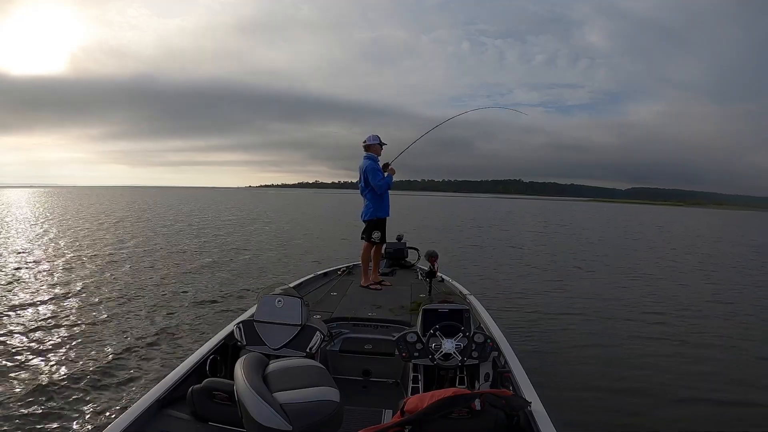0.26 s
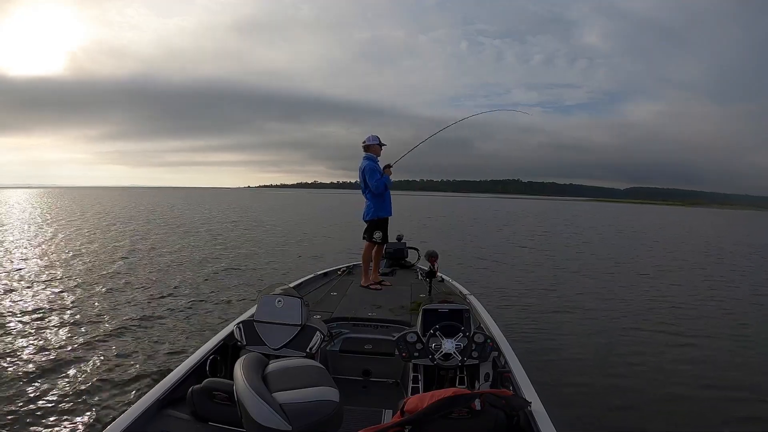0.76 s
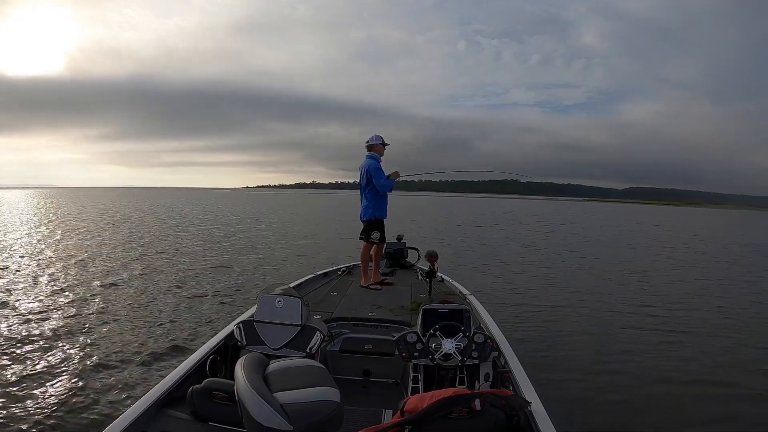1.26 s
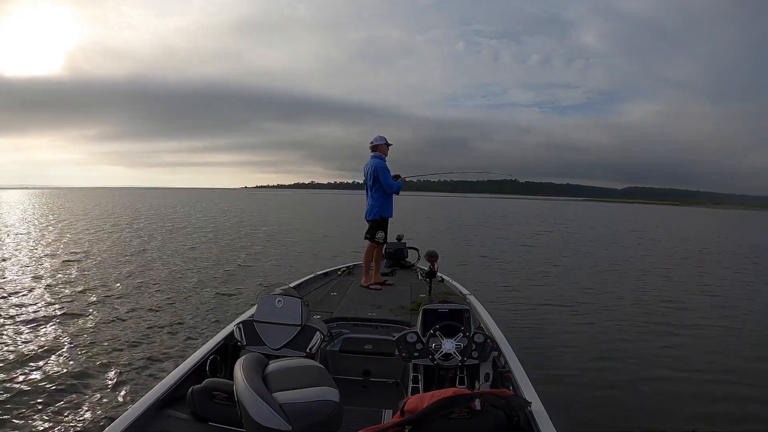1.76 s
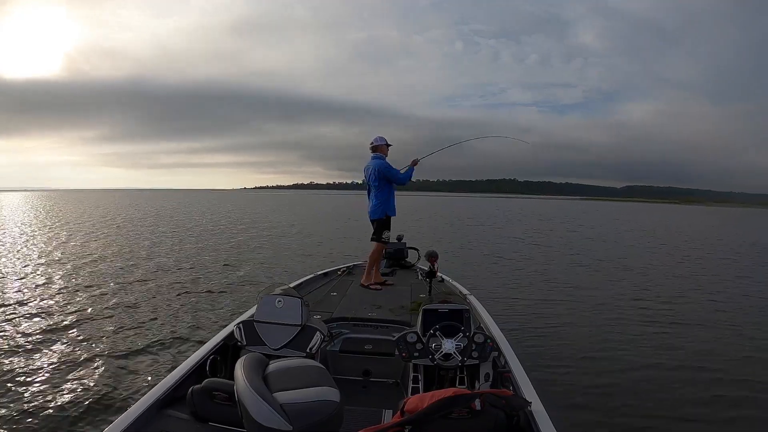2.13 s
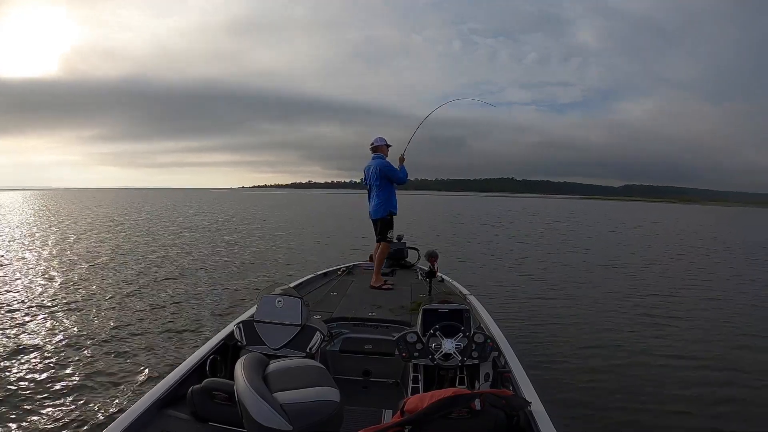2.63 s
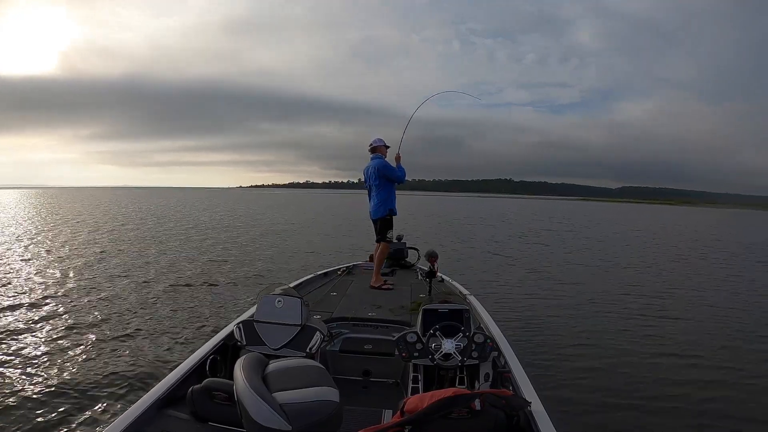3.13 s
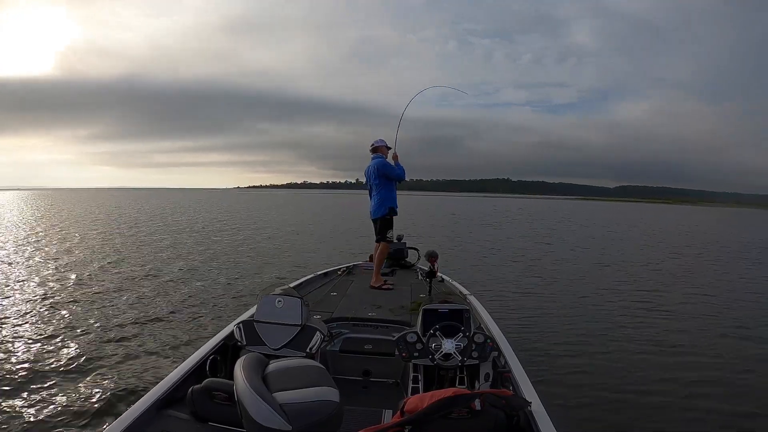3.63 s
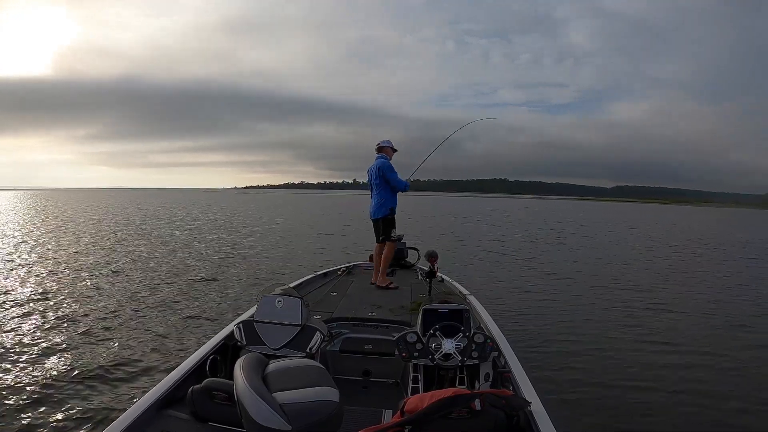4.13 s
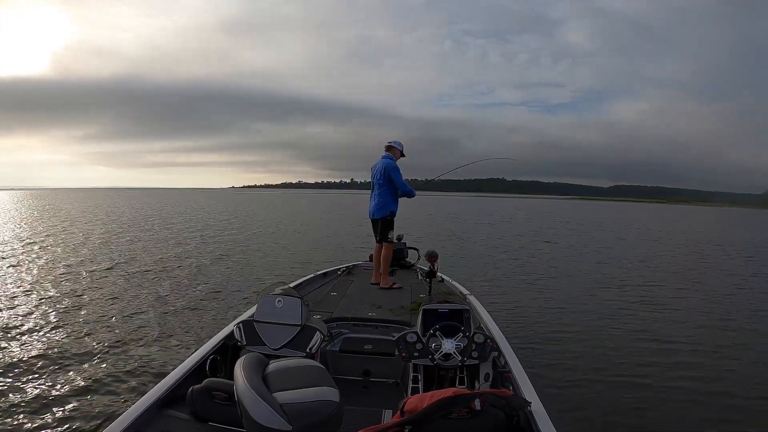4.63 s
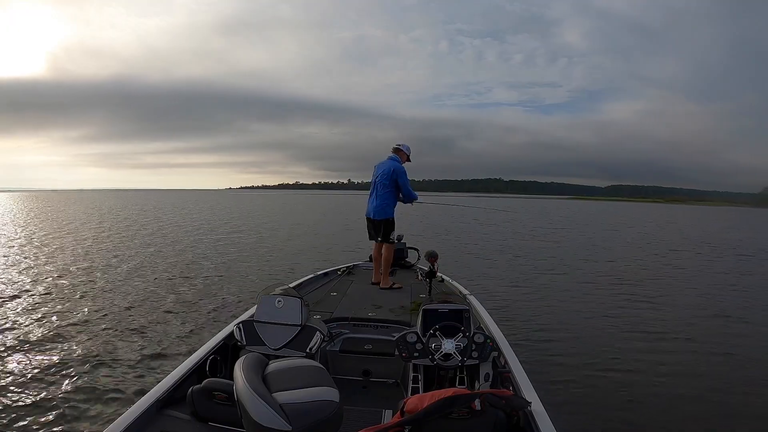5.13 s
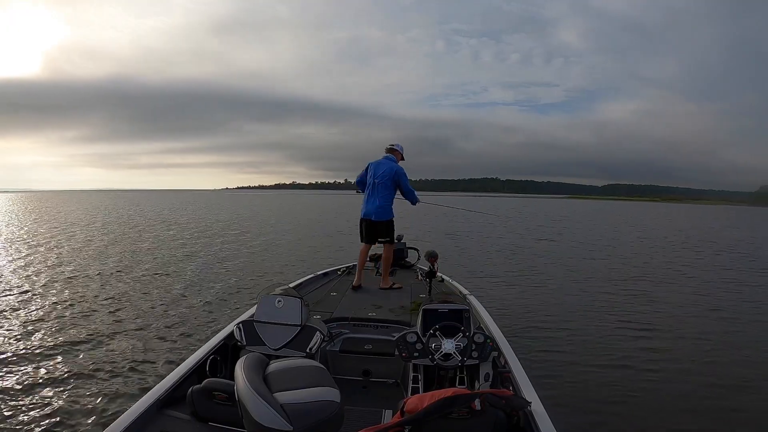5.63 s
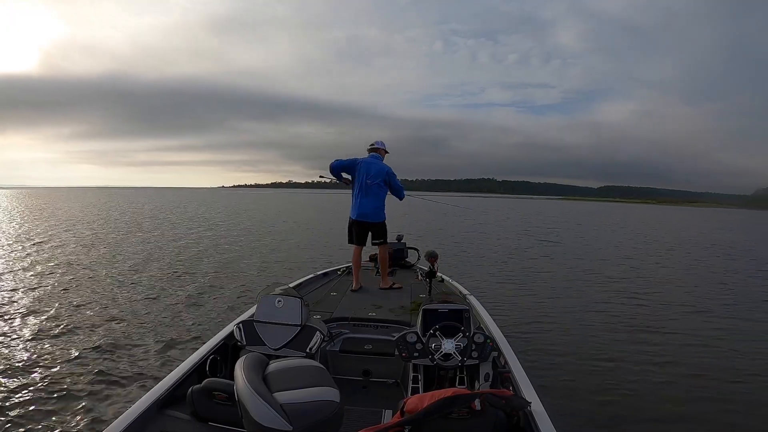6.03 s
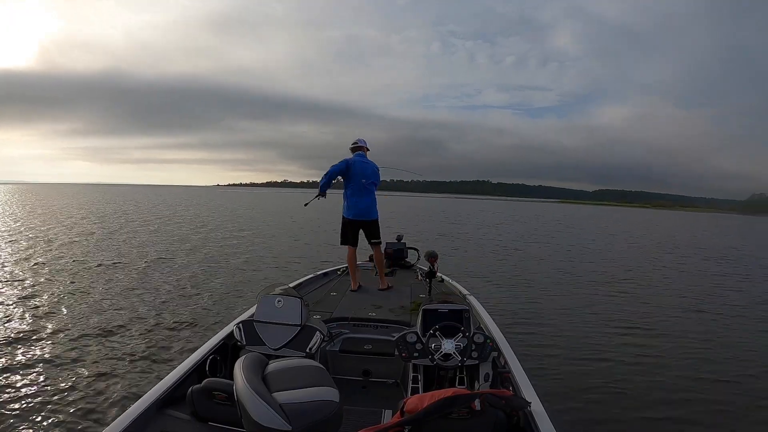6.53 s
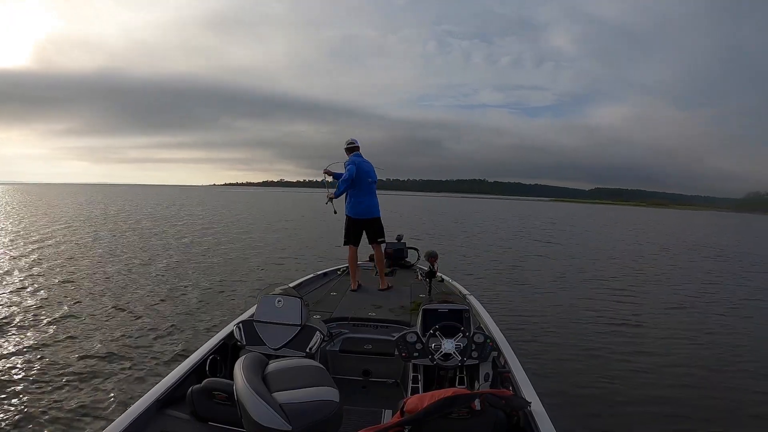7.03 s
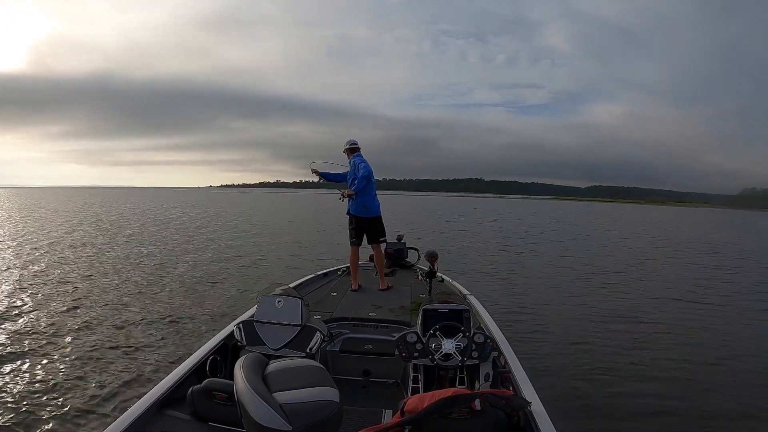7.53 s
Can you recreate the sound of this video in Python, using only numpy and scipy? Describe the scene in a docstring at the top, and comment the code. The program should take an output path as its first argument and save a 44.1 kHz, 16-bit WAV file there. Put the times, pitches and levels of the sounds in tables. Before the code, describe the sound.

Stereo microphone on a boat, dry open air, no echo. Low wind rumble flutters differently on each side. Hollow hull knocks near 400 hertz come irregularly from the left, the strongest around six seconds, with tiny spray clicks and bubble plinks between. An angler's sleeves and line swish briefly, most clearly after six seconds. Distant water hiss stays faint; a few barely audible thin whistles pass.

```python
"""Small boat on open water

Close by, left of the microphone, wavelets knock the hollow hull: gliding air-pocket tones, hull modes and spray noise.
Spray and tackle tick as noise bursts, drops ring as gliding sines, and sleeves and line swish as swelling noise.
Faint near-sine whistles come from afar; low noise is wind on the two microphone ports.
Smooth hiss from the ripples fills the distance."""
import sys
import numpy as np
from scipy import signal
from scipy.fft import rfft, irfft, next_fast_len
from scipy.io import wavfile
from scipy.ndimage import uniform_filter1d

SR = 44100
rng = np.random.default_rng(int(sys.argv[2]) if len(sys.argv) > 2 else 0)


def master(y):
    """Save y as 16-bit WAV."""
    cut = np.clip(np.atleast_2d(y).T, -1, 1)
    pcm = np.round(cut * 32767)  # scale
    wavfile.write(sys.argv[1], SR, pcm.astype(np.int16))


N = 343098
FFT_SIZE = next_fast_len(N)
BIN_HZ = np.maximum(np.fft.rfftfreq(FFT_SIZE, 1 / SR), 1)

# Balances are left minus right. Spectra are relative densities: [f/Hz, level/dB per Hz].
# Wavelets on the hull, before filtering and panning: [t/s, slap level/dB, air pocket f/Hz, its relative rise/(1/s),
# pocket level/dB, pocket life to 1/e /s, upper deep mode level/dB, factor on the life of the deep modes]
HULL_KNOCKS = [(.782, -24, 403, 3.17, -28, .031, -44, .6), (1.311, -24, 425, .5, -49, .02, -59, .6),
               (1.959, -30, 433, .46, -40, .065, -40, .95), (2.916, -29, 487, 1.88, -42, .019, -45, .41),
               (3.51, -28, 429, 1.12, -33, .073, -37, .91), (4.174, -27, 473, 3.99, -40, .031, -37, .61),
               (6.03, -20, 413, -1.16, -29, .015, -28, .56), (6.608, -28, 411, 4.0, -36, .026, -47, 1.04),
               (7.197, -28, 435, -1.53, -41, .031, -47, 1.05)]
# Deep hull modes, lower then upper: [f/Hz, life to 1/e before each knock's factor /s]
DEEP_HULL_MODES = [(350, .05), (468, .07)]
# Dry part of the hull ringing on: [f/Hz, level relative to the upper deep mode/dB, t60/s]
DRY_HULL_RING = (468, -23, .45)
# Short hull modes rung by the slap, before scatter: [f/Hz, level relative to the slap/dB, t60/s]
SHORT_HULL_MODES = [(941, -3.5, 0.019), (1129, -6.5, 0.017), (1443, -13, 0.017), (1786, -19.5, 0.028),
                    (2250, -22, 0.011), (2840, -18.5, 0.03), (3425, -22, 0.018), (4740, -30, 0.015)]
# Spray thrown by a knock: [f/Hz, level/dB per Hz]
SPRAY_SPECTRUM = [(600, -2), (1000, 3.5), (2500, -10), (5000, -6), (9000, -24.5), (13000, -77)]
LOWER_MODE_DB = -14.5   # lower deep mode relative to the pocket
HULL_LAG_S = .00045   # the hull answers just after the pocket
SLAP_DETUNE = .05   # relative spread of the short modes above the first, by where the wavelet lands
SPRAY_DB, SPRAY_SPLIT_HZ = -16.5, 3050   # level relative to the slap
SPRAY_LOW_T60_S, SPRAY_HIGH_T60_S = 0.079, 0.039   # fine spray above the split dies sooner
DEEP_BALANCE_DB, SLAP_BALANCE_DB = 3.5, 6

# Ticks of spray and tackle: [t/s, nominal peak level/dB, centre f/Hz, band reach each way/octaves]
SPRAY_TICKS = [(0.206, -62.5, 1500, 1.65), (0.264, -50, 1750, 1.56), (0.411, -62.5, 4180, 0.83),
               (.583, -51, 1470, 0.62), (.641, -64.5, 6800, 0.44), (.764, -62, 4930, 0.59),
               (.821, -58, 3120, 1.1), (.84, -54, 3920, 0.37), (0.883, -57.5, 5860, 1.2),
               (1.312, -38.5, 883, 0.17), (1.684, -59.5, 3820, 0.13), (1.772, -65.5, 1410, 1.3),
               (1.827, -63.5, 1134, 0.79), (2.201, -64.5, 5170, 0.53), (2.26, -41, 670, 1.01),
               (2.299, -48, 1700, 1.15), (2.375, -55, 2680, 0.4), (2.447, -58, 1820, 0.16),
               (2.48, -55.5, 2030, 0.21), (2.499, -53.5, 2260, 1.05), (2.552, -40, 1090, 1.52),
               (2.569, -56, 6000, 0.76), (2.594, -40.5, 1940, 0.71), (3.215, -61, 4160, 0.48),
               (3.387, -60, 890, 0.97), (3.487, -55.5, 900, 1.63), (3.897, -67, 6200, 0.54),
               (3.982, -50.5, 4900, 0.59), (3.99, -31.5, 2040, 0.98), (4.143, -64.5, 3190, .5),
               (4.477, -61.5, 2000, 0.31), (4.642, -66, 6600, .43), (4.741, -60.5, 3080, 0.27),
               (4.965, -62.5, 2530, 0.57), (5.135, -63, 3370, 0.34), (5.254, -52, 2060, 1.18),
               (5.378, -60, 2460, 0.43), (5.391, -54, 4040, 0.32), (5.676, -62, 5100, 0.18),
               (5.722, -58, 555, 0.35), (5.761, -65.5, 10300, 0.46), (6.19, -54.5, 2380, .34),
               (6.23, -44.5, 4120, .34), (6.524, -63, 6160, 0.15), (7.224, -38, 2230, 0.52),
               (7.265, -51.5, 2400, 0.82), (7.35, -63.5, 6400, 0.71), (7.3, -72, 4000, 1.1),
               (7.512, -62.5, 3000, 0.97), (7.642, -59.5, 2960, 0.6)]
TICK_T60_S, TICK_T60_SLOPE = 0.057, -0.29   # t60 at 2 kHz, exponent over frequency
CRACK_DB, CRACK_T60_S = -14.5, .025   # wide, bright opening of every tick
SPLASH_BALANCE_DB, SPLASH_SCATTER_DB = 6.5, 2.0   # ticks and drops fall along the left side
FINE_TICKS_PER_S, FINE_TICKS_DB = 50, -77   # mean rate, smallest size before the tilt
FINE_TICK_TILT_DB = -0.5   # per octave

# Drops and their ringing bubbles: [t/s, nominal peak level/dB, f/Hz, relative rise/(1/s)]
WATER_DROPS = [(.394, -68, 2550, .5), (.42, -64, 4400, .5), (.48, -67, 1880, .5), (.69, -68, 1200, .5),
               (.833, -57, 1040, .85), (.903, -55.5, 4510, .5), (1.454, -58, 1800, 0.38),
               (2.234, -64, 2880, 0.46), (2.435, -55, 2610, .5), (2.558, -49.5, 1300, 0.95),
               (2.598, -47.5, 820, 7.6), (2.612, -53, 1410, 1), (2.712, -68, 5250, .5),
               (2.809, -52, 2200, .6), (3.199, -56, 1580, .57), (3.692, -58, 1215, .65),
               (3.93, -61.5, 2450, .55), (3.93, -58, 1624, .5), (4.007, -56.5, 940, .5),
               (4.055, -49, 5500, .62), (4.35, -67, 5900, .5), (5.252, -60, 402, 0.4),
               (5.342, -46.5, 3240, .43), (5.391, -61.5, 1770, .5), (5.507, -51, 3350, 0.81),
               (5.698, -51, 597, .5), (5.956, -67, 6370, 0.56), (5.975, -70, 2480, .5),
               (6.055, -63, 5330, .44), (6.072, -58, 2730, .55), (6.145, -68, 5800, .5),
               (6.149, -59, 1840, .5), (6.516, -59, 388, 65), (6.651, -60, 6700, .5),
               (6.666, -65, 6200, .43), (6.848, -62.5, 1520, .5), (6.98, -54.5, 987, 0.47),
               (7.374, -47, 2270, .41), (7.514, -54, 1340, .5), (7.558, -65, 2650, .5),
               (7.584, -56.5, 2900, 8.0), (7.612, -64, 3300, .5)]
DROP_T60_S, DROP_T60_SLOPE = 0.046, -0.66   # t60 at 2 kHz, exponent: small bubbles die sooner
DROP_SPLASH_DB = -12   # impact of a drop, under its ring

# Strokes of cloth and line: [start t/s, end t/s, swish level at the crest/dB, thin hiss level at the crest/dB]
CLOTH_STROKES = [(-.06, 0.13, -102, -81), (1.194, 1.34, -72.5, -81), (1.607, 1.7, -77.5, -82),
                 (2.338, 2.406, -68.5, -72), (2.44, 2.62, -61, -65), (3.865, 4.127, -78.5, -80),
                 (4.229, 4.348, -66.5, -76), (4.183, 5.35, -84.5, -80.5), (4.407, 4.76, -94, -83),
                 (4.73, 4.888, -94, -75), (4.894, 5.174, -92, -82.5), (5.208, 5.417, -70.5, -98),
                 (5.406, 5.775, -84, -71.5), (6.157, 6.413, -54.5, -64.5), (6.463, 6.652, -65, -73),
                 (7.197, 7.46, -79, -84)]
# Body of the swish: [f/Hz, level/dB per Hz]
CLOTH_BODY_SPECTRUM = [(500, -36), (900, -9), (1300, 1), (2200, -2), (4500, -7.5), (8500, -22.5),
                       (13000, -38)]
# Thin hiss of the swish: [f/Hz, level/dB per Hz]
CLOTH_HISS_SPECTRUM = [(2000, -11), (3500, 5), (6000, 3.5), (8500, 4), (10500, -5), (12500, -16),
                       (15000, -40)]
# Left-right correlation of the swish: [f/Hz, correlation from -1 to 1]
CLOTH_LIKENESS = [(60, -0.06), (180, -0.23), (520, 0.26), (1530, 0.85), (4520, 0.47), (13300, -0.48)]

# Whistles from afar: [start t/s, length/s, start f/Hz, end f/Hz, level before flutter/dB]
FAR_WHISTLES = [(4.374, 0.074, 1400, 1237, -78), (5.13, .12, 1300, 1194, -79), (6.785, .1, 4260, 4215, -85),
                (7.023, 0.081, 4240, 4215, -84)]
WHISTLE_FADE_S = 0.017

# Wind on the ports: [t/s, rumble level/dB, balance before port weights/dB, deep buffeting level/dB]
PORT_WIND = [(0.0, -46, -8.5, -46.5), (0.11, -45, -11, -42.5), (0.35, -43.5, -11.5, -38),
             (0.65, -43.5, -8, -44.5), (1.08, -42, -10.5, -39.5), (3.88, -48, -11, -46.5),
             (4.53, -50.5, -8.5, -40.5), (4.72, -49, -5, -52), (4.85, -45.5, -12, -34.5),
             (4.96, -53.5, -1.5, -50.5), (5.31, -52.5, -7, -47.5), (5.81, -47.5, -6, -41.5),
             (6.2, -52, -10, -53.5), (6.35, -50, -5.5, -42), (6.39, -50.5, -10, -49),
             (7.37, -57.5, -3, -59), (7.45, -61, 2.5, -53), (7.78, -58, -6.5, -57.5)]
# Rumble at the left port: [f/Hz, level/dB per Hz]
LEFT_PORT_SPECTRUM = [(60, -11), (90, 2.5), (150, -5.5), (230, -13.5), (330, -22.5), (500, -35), (800, -49),
                      (1200, -71.5)]
# Rumble at the right port: [f/Hz, level/dB per Hz]
RIGHT_PORT_SPECTRUM = [(60, 3), (90, -1.5), (150, 2.5), (230, -6.5), (330, -21), (500, -34.5), (800, -53),
                       (1200, -56)]
# Deep buffeting at either port: [f/Hz, level/dB per Hz]
BUFFET_SPECTRUM = [(15, 2.5), (25, 0), (45, 1.5), (65, -3), (100, -22)]
LEFT_WEIGHT, RIGHT_WEIGHT = 0.33, -1.546   # how far half the balance moves each port
CALM_DB = -44.5   # port level at which the rumble has its plain colour
GUST_BRIGHTENS = 0.77   # extra dB in the upper rumble for each dB of wind
BUFFET_BALANCE_DB = -6   # before port weights
BUFFET_SWING_DB, BUFFETS_PER_S = 1, 2.27   # spread and rate of the wander

# Ripples around the boat: [t/s, level/dB]
RIPPLE_LEVELS = [(0, -75.5), (2.4, -73.5), (3.2, -77), (4.1, -73), (5.1, -75), (6.1, -71.5), (6.8, -74),
                 (7.78, -72)]
# Far hiss of the water: [f/Hz, level/dB per Hz]
WATER_SPECTRUM = [(400, 3), (800, -6.5), (1250, -2), (1800, -8.5), (3500, -14), (7000, -19.5), (10000, -27),
                  (12500, -38.5), (16000, -39.5)]
CUTOFF_HZ = 15500   # the recorder's stop band starts here


def hull_knocks():
    """A trapped air pocket beats with the deep hull modes; the wavelet's front rings short modes and throws spray."""
    return hull_deep() * panned(DEEP_BALANCE_DB) + (hull_slap() + hull_spray()) * panned(SLAP_BALANCE_DB)


def hull_deep():
    """Pocket and deep hull modes are swallowed by the water while the dry part of the hull rings on."""
    deep = np.zeros(N)
    dry_hz, dry_db, dry_t60 = DRY_HULL_RING
    for s, _, pocket_hz, rise, pocket_db, life, upper_db, life_factor in HULL_KNOCKS:
        add(deep, s, from_db(pocket_db) * swallowed(pocket_hz, rise, life))
        modes_db = pocket_db + LOWER_MODE_DB, upper_db
        for (hz, mode_life), level_db in zip(DEEP_HULL_MODES, modes_db):
            add(deep, s + HULL_LAG_S, from_db(level_db) * swallowed(hz, 0, mode_life * life_factor))
        add(deep, s + HULL_LAG_S, from_db(upper_db + dry_db) * blip(dry_hz, 0, dry_t60))
    return filtered(deep, 2, [280, 620], "band")   # the water loads the hull slowly


def hull_slap():
    """Each wavelet front excites the short hull modes with its own strengths and detuning."""
    slap = np.zeros(N)
    for k, (mode_hz, level_db, t60) in enumerate(SHORT_HULL_MODES):
        scatter = rng.standard_normal((len(HULL_KNOCKS), 2))
        for (s, slap_db, *_), (strength, shift) in zip(HULL_KNOCKS, scatter):
            gain = from_db(slap_db + level_db + 3 * strength) * (-1) ** k
            hz = mode_hz * (1 + SLAP_DETUNE * shift * min(k, 1))
            add(slap, s, gain * blip(hz, 0, t60))
    return filtered(slap, 2, [600, 6000], "band")   # a wet, soft contact


def hull_spray():
    """Each knock throws noise whose low and high parts die at different rates."""
    rows = np.array(HULL_KNOCKS)
    blows, out = np.zeros(N), np.zeros(N)
    blows[np.round(rows[:, 0] * SR).astype(int)] = from_db(rows[:, 1] + SPRAY_DB)
    spray = coloured(SPRAY_SPECTRUM)
    for kind, t60 in (("low", SPRAY_LOW_T60_S), ("high", SPRAY_HIGH_T60_S)):
        fading = signal.lfilter([1], [1, -from_db(-60 / (t60 * SR))], blows + 1e-18)
        fading = uniform_filter1d(fading, size=121)   # spray builds over three milliseconds
        out += fading * filtered(spray, 2, SPRAY_SPLIT_HZ, kind)
    return out


def swallowed(hz, rise, life):
    """A gliding tone that holds, then is damped ever faster as the water closes over it."""
    t = np.arange(16384) / SR
    pitch = hz * (1 + rise * np.minimum(t, life))
    return np.sin(2 * np.pi * np.cumsum(pitch) / SR) * np.exp(-(t / life) ** 2)


def ticks():
    """Spray and tackle tick as dying noise bursts, each in its own band and opened by a bright crack."""
    out, t = np.zeros((2, N)), np.arange(8192) / SR
    contact = np.minimum(t / .0015, 1)   # a wet contact takes a moment
    noises = rng.standard_normal((len(SPRAY_TICKS), len(t)))
    balances = splash_balances(len(SPRAY_TICKS))
    for (s, peak_db, hz, reach), noise, balance_db in zip(SPRAY_TICKS, noises, balances):
        t60 = TICK_T60_S * (hz / 2000) ** TICK_T60_SLOPE
        band = np.clip([hz / 2 ** reach, hz * 2 ** reach], 330, 11500)
        burst = noise * contact * from_db(-60 * t / t60)
        burst *= 1 + np.exp(-t / 0.002)   # the first contact is the hardest
        burst = filtered(burst, 3, band, "band")
        burst /= 2.5 * np.sqrt(np.mean(burst[:300] ** 2))   # its peaks come near 1
        crack = noise[::-1] * contact * from_db(CRACK_DB - 60 * t / CRACK_T60_S)
        burst += filtered(crack, 4, [1800, 8500], "band")
        add(out, s, from_db(peak_db) * burst * panned(balance_db))
    return out


def drops():
    """Each drop splashes in a wide band and closes a bubble that swells within a cycle and rings out unevenly."""
    out, t = np.zeros((2, N)), np.arange(16384) / SR
    noises = rng.standard_normal((len(WATER_DROPS), len(t)))
    balances = splash_balances(len(WATER_DROPS))
    for (s, peak_db, hz, rise), noise, balance_db in zip(WATER_DROPS, noises, balances):
        t60 = DROP_T60_S * (hz / 2000) ** DROP_T60_SLOPE
        splash = rms_one(filtered(noise, 2, [hz / 1.5, min(hz * 1.5, 9000)], "band"))
        splash *= from_db(DROP_SPLASH_DB - 60 * t / 0.025)
        splash *= np.minimum(t / .0015, 1)   # a wet contact takes a moment
        uneven = 1 + 0.85 * rms_one(uniform_filter1d(noise, size=150))
        bubble = blip(hz, rise, t60) * np.minimum(t * hz / 0.86, 1) * uneven
        add(out, s, from_db(peak_db) * (bubble + splash) * panned(balance_db))
    return out


def splash_balances(count):
    """Left minus right dB for each of a run of small splashes."""
    return SPLASH_BALANCE_DB + SPLASH_SCATTER_DB * rng.standard_normal(count)


def fine_ticks():
    """Tiny drops burst at random times and ring, falling 60 dB in 48 cycles."""
    sizes_db = FINE_TICKS_DB + 2.5 * np.minimum(rng.exponential(1, N), 4)
    sizes = from_db(sizes_db) * rng.choice([-1, 1], N)
    clicks = sizes * (rng.random(N) < FINE_TICKS_PER_S / SR)
    pitches = np.geomspace(900, 10000, 14)
    dealt = rng.integers(0, 14, N)   # which pitch each click rings
    out = np.zeros(N)
    for k, hz in enumerate(pitches):
        tilt_db = FINE_TICK_TILT_DB * np.log2(hz / pitches[7])
        out += from_db(tilt_db) * ring(clicks * (dealt == k), hz, 48 / hz)
    return out * panned(2.7)


def swish():
    """Cloth and line rub near the microphone: grainy noise swells and fades, most alike left and right in mid range."""
    t, body, hiss = np.arange(N) / SR, 0, 0
    for start, end, body_db, hiss_db in CLOTH_STROKES:
        stroke = np.sin(np.pi * np.clip((t - start) / (end - start), 0, 1)) ** 2
        body = body + from_db(body_db) * stroke
        hiss = hiss + from_db(hiss_db) * stroke
    alike = at_hz(CLOTH_LIKENESS, BIN_HZ)
    grain = from_db(1.3 * drift(120))   # fibres catch and slip
    out = 0
    for spectrum, level in ((CLOTH_BODY_SPECTRUM, body), (CLOTH_HISS_SPECTRUM, hiss)):
        mid = coloured(spectrum, np.sqrt(1 + alike))
        side = coloured(spectrum, np.sqrt(1 - alike))
        rubbing = patchy(np.array([mid + side, mid - side]), patchy_db=1.8, rate=25)
        out = out + level * grain * rubbing
    return out


def whistles():
    """Thin near-sine notes from afar that sag a little, equal on both sides."""
    out = np.zeros(N)
    for s, length, start_hz, end_hz, level_db in FAR_WHISTLES:
        t = np.arange(int(length * SR)) / SR
        fade = np.clip(np.minimum(t, length - t) / WHISTLE_FADE_S, 0, 1)
        phase = 2 * np.pi * np.cumsum(np.linspace(start_hz, end_hz, len(t))) / SR
        add(out, s, np.sqrt(2) * from_db(level_db) * fade * np.sin(phase))
    return out * from_db(3.5 * drift(31))   # the air between makes them flutter


def wind():
    """Turbulence at each microphone port is its own noise; gusts are louder and brighter."""
    level_db, balance_db, deep_db = in_time(PORT_WIND)
    out = []
    for weight, spectrum in ((LEFT_WEIGHT, LEFT_PORT_SPECTRUM), (RIGHT_WEIGHT, RIGHT_PORT_SPECTRUM)):
        port_db = level_db + weight * balance_db / 2
        rumble = coloured(spectrum)
        upper = filtered(rumble, 2, 260, "high")
        rumble = rumble + upper * (from_db(GUST_BRIGHTENS * (port_db - CALM_DB)) - 1)
        lumps = from_db(1.97 * drift(8.5))
        swing = rms_one(from_db(BUFFET_SWING_DB * drift(BUFFETS_PER_S)))
        buffet_db = deep_db + weight * BUFFET_BALANCE_DB / 2
        buffet = coloured(BUFFET_SPECTRUM) * swing * from_db(buffet_db)
        out.append(lumps * (rumble * from_db(port_db) + buffet))
    return np.array(out)


def open_water():
    """Smooth far hiss of ripples: separate noise on each side, with a slight flicker in common."""
    hiss = np.array([coloured(WATER_SPECTRUM), coloured(WATER_SPECTRUM)])
    return from_db(in_time(RIPPLE_LEVELS)[0]) * patchy(hiss, patchy_db=.6, rate=8)


def blip(hz, rise, t60):
    """A dying sine whose pitch glides for the first half of its t60."""
    t = np.arange(16384) / SR
    pitch = hz * (1 + rise * np.minimum(t, t60 / 2))
    return np.sin(2 * np.pi * np.cumsum(pitch) / SR) * from_db(-60 * t / t60)


def ring(clicks, hz, t60):
    """A unit click sets a sine of about height 1 ringing in a two-pole resonator."""
    r, w = from_db(-60 / (t60 * SR)), 2 * np.pi * hz / SR
    return signal.lfilter([0, np.sin(w)], [1, -2 * r * np.cos(w), r * r], clicks + 1e-18)


def coloured(spectrum, weight=1):
    """Noise with the given spectrum, silent outside it; rms 1 before the weight on its bins."""
    inside = (BIN_HZ > spectrum[0][0]) & (BIN_HZ < spectrum[-1][0])
    bins = rfft(rng.standard_normal(FFT_SIZE)) * from_db(at_hz(spectrum, BIN_HZ)) * inside
    unit = FFT_SIZE / np.sqrt(2 * np.sum(np.abs(bins) ** 2))
    return irfft(bins * weight, FFT_SIZE)[:N] * unit


def patchy(x, patchy_db, rate):
    """Overlapping octave bands of a noise flicker on their own; the sum has rms 1."""
    octave = np.log2(BIN_HZ / 700).clip(0, 4)
    spectrum = rfft(x, FFT_SIZE)
    out = 0
    for k in range(5):
        share = np.maximum(1 - np.abs(octave - k), 0)
        band = irfft(spectrum * share, FFT_SIZE)[..., :N]
        out = out + band * from_db(patchy_db * drift(rate))
    return rms_one(out)


def drift(rate):
    """Slow random wander of rms 1: noise through a double pole at rate Hz, run at every 40th sample."""
    r = np.exp(-80 * np.pi * rate / SR)
    noise = rng.standard_normal(N // 40 + 2002)
    slow = signal.lfilter([1], [1, -2 * r, r * r], noise)[2000:]   # skip the run-in
    return np.interp(np.arange(N) / 40, np.arange(len(slow)), rms_one(slow))


def filtered(x, order, hz, kind):
    """Butterworth filter."""
    return signal.sosfilt(signal.butter(order, hz, kind, fs=SR, output="sos"), x)


def from_db(db):
    """Decibels to gain."""
    return 10 ** (np.asarray(db) / 20)


def rms_one(x):
    """Scale to unit rms."""
    return x / np.sqrt(np.mean(x ** 2) + 1e-20)


def panned(balance_db):
    """Left and right gains for a level difference."""
    return np.array([[from_db(balance_db / 2)], [from_db(-balance_db / 2)]])


def in_time(rows):
    """Table columns as curves over all samples."""
    s, *columns = np.transpose(rows)
    return [np.interp(np.arange(N) / SR, s, c) for c in columns]


def at_hz(points, hz):
    """Read a spectrum on a log-frequency axis."""
    point_hz, values = np.transpose(points)
    return np.interp(np.log(hz), np.log(point_hz), values)


def add(out, s, sound):
    """Mix a short sound in at a time."""
    i = round(s * SR)
    out[..., i:i + sound.shape[-1]] += sound[..., :N - i]


def scene():
    """All sources on the boat and around it, left and right."""
    boat = hull_knocks() + ticks() + drops() + fine_ticks() + swish()
    return boat + whistles() + wind() + open_water()


def record(dry):
    """The top is cut steeply, to at least 70 dB down in the stop band."""
    return signal.sosfilt(signal.cheby2(12, 70, CUTOFF_HZ, fs=SR, output="sos"), dry)


dry = scene()
out = record(dry)
master(out)
```